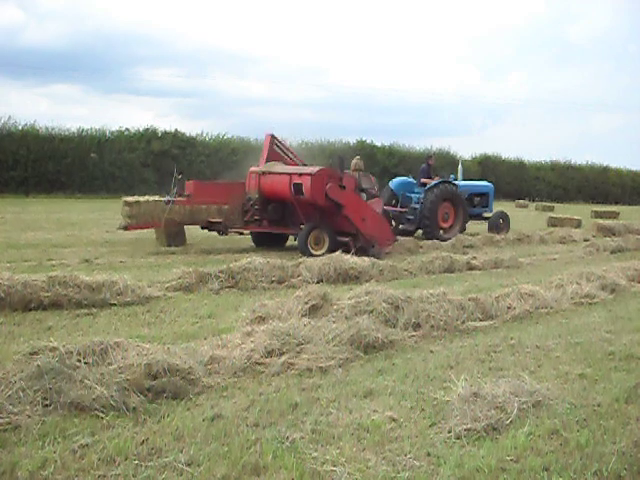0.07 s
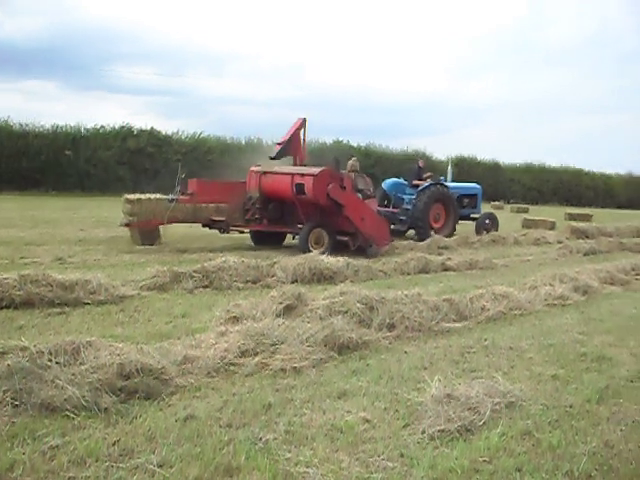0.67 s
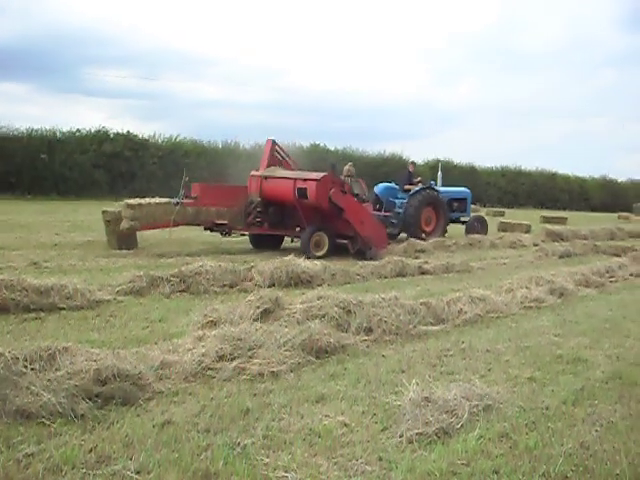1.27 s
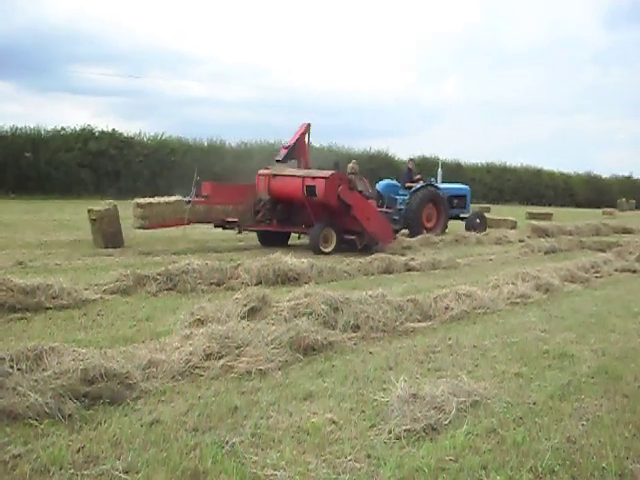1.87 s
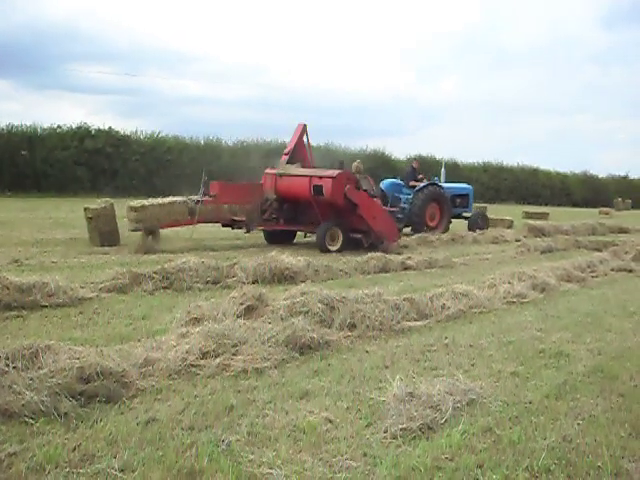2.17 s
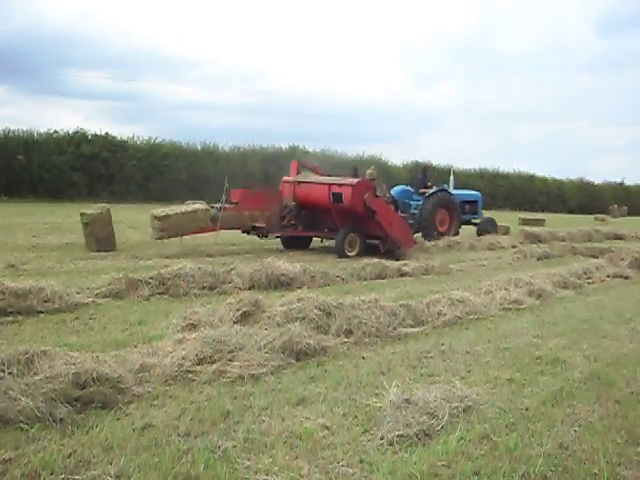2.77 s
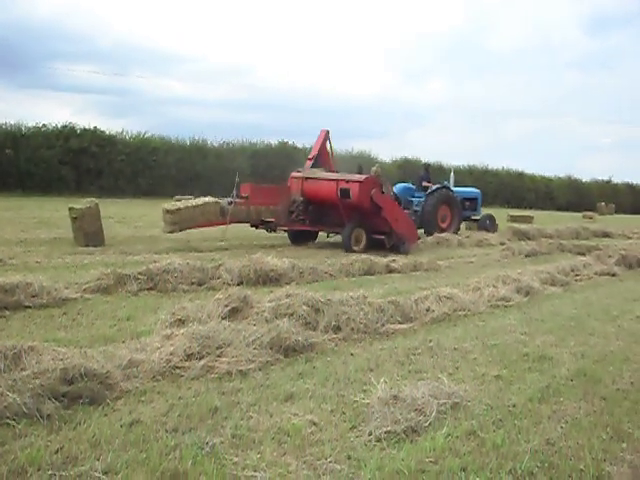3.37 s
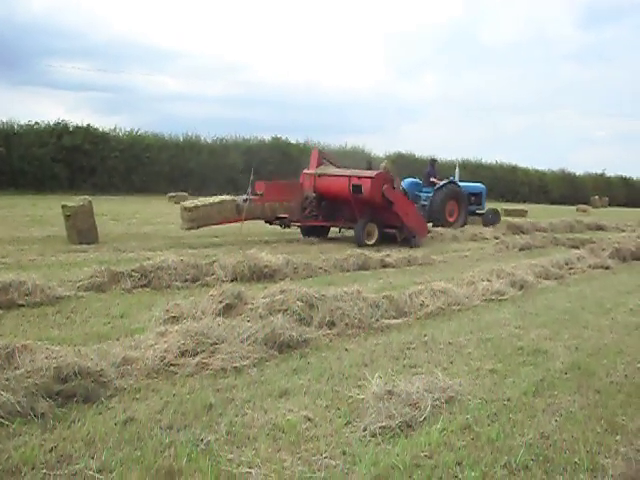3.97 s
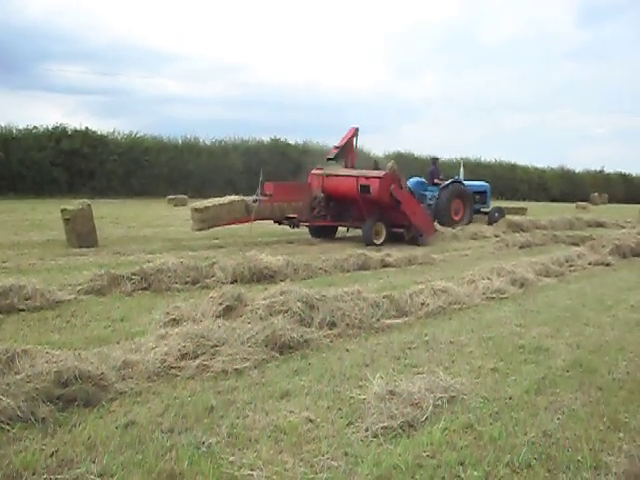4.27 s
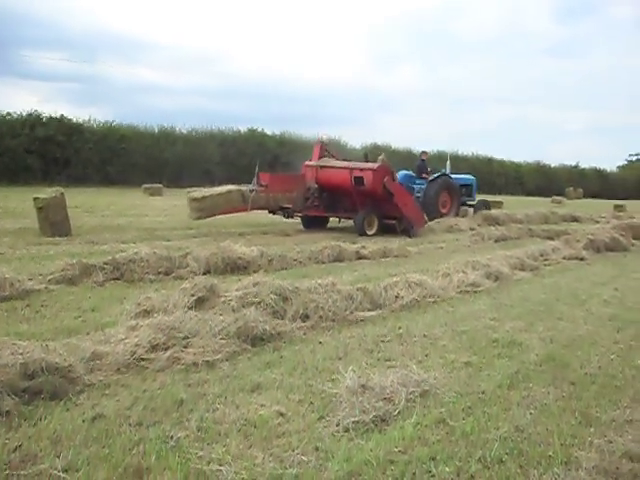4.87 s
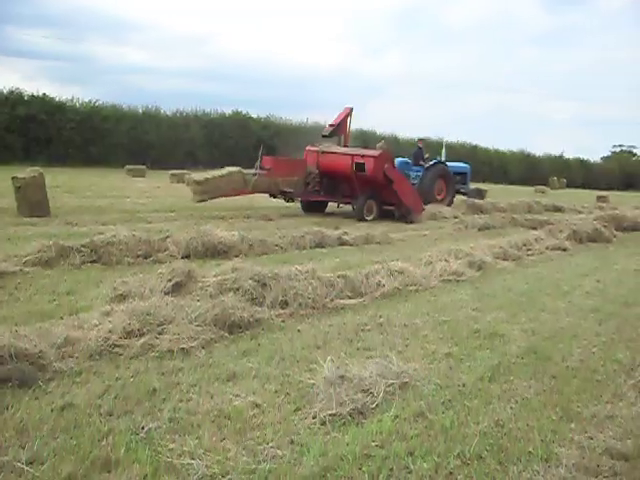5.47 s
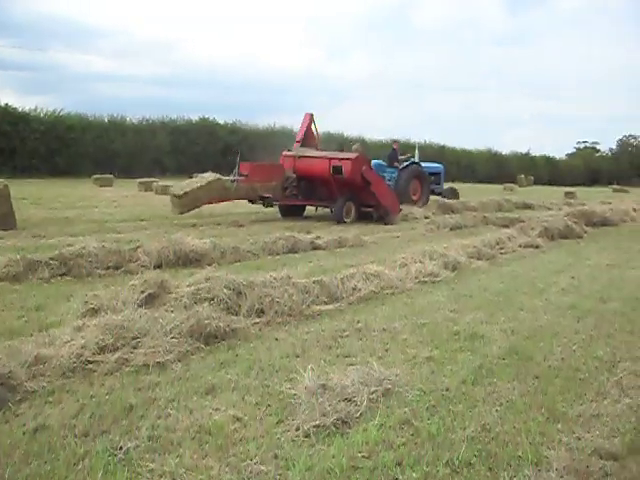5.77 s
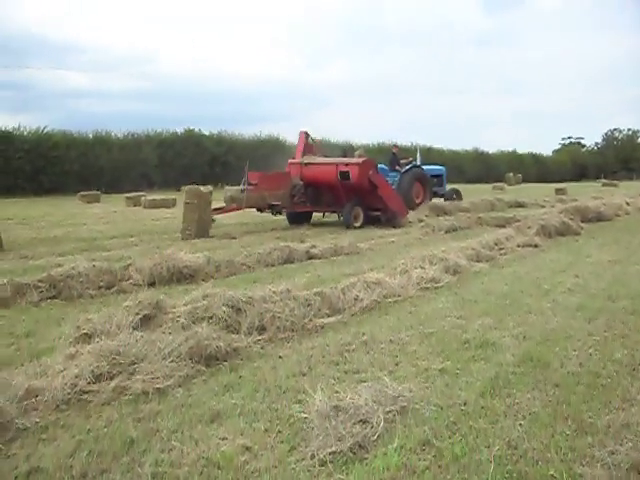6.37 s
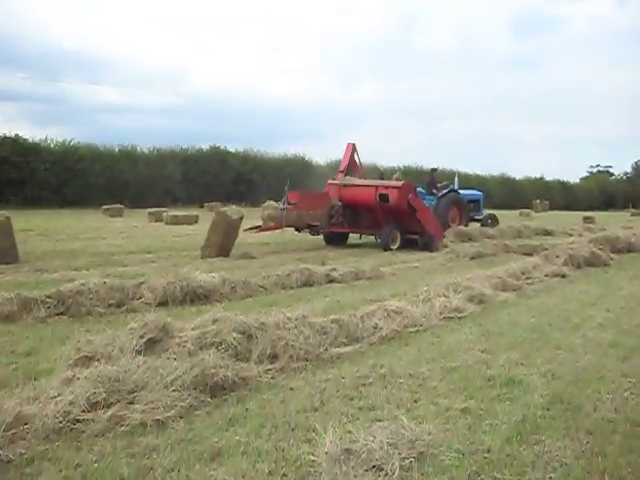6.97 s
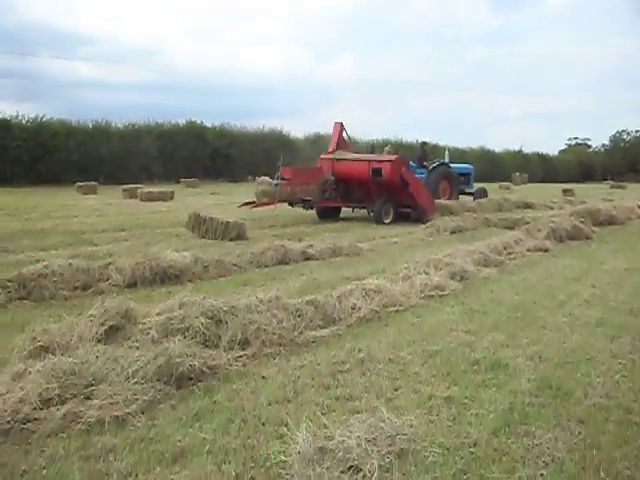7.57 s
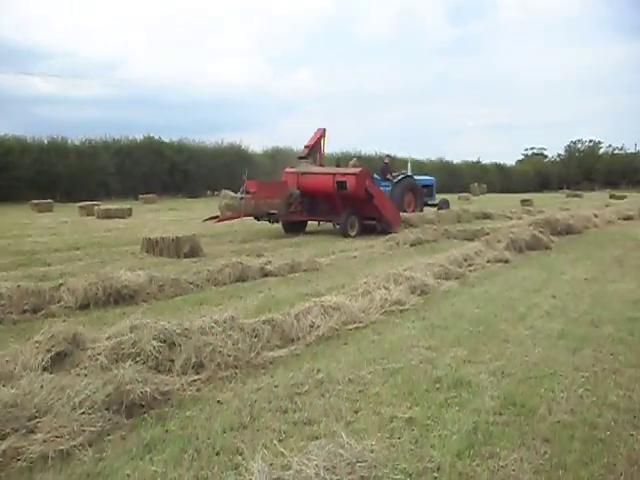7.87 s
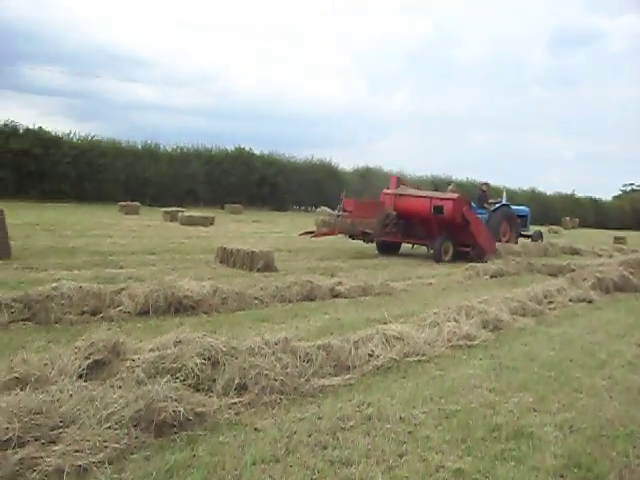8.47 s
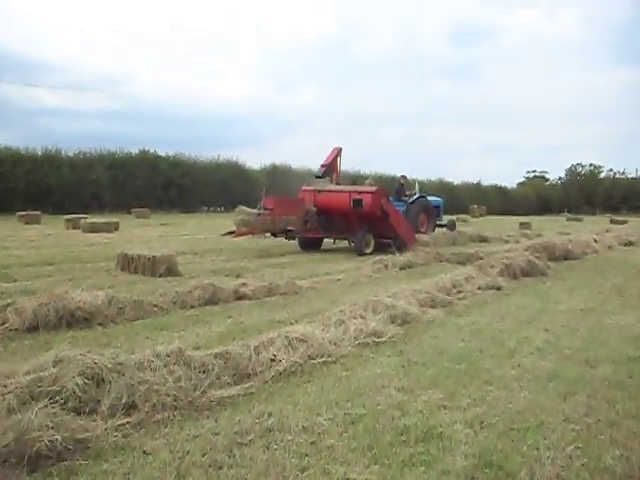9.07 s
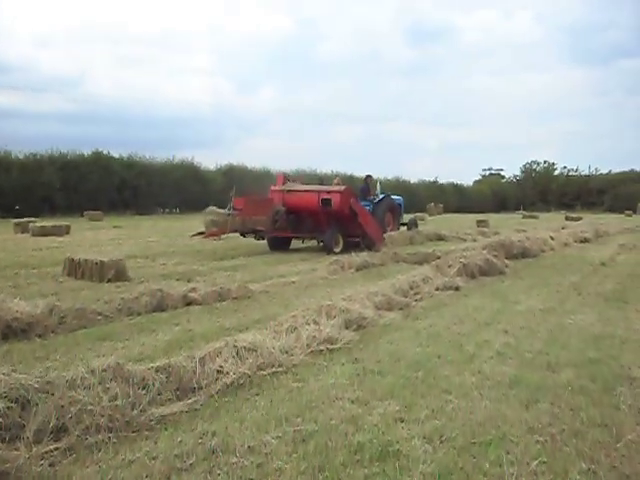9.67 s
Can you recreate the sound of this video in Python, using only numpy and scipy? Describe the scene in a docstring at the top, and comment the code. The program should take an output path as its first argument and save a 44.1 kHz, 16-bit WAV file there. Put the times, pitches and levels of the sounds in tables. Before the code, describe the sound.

A tractor chugs some way off while a hay baler rattles, clanks and knocks regularly, with gusts on the microphone.

```python
"""Tractor and hay baler in a field

Some way off, an old tractor chugs along, pulling a baler with a humming drive. The baler's pick-up
rattles through dry hay, and its ram packs the hay into a droning steel chamber, knocking about every
1.2 s. Linkages clank, and metal parts squeak, ring and chink. Gusts buffet the microphone, mostly in
the first seconds, and a faint, high whistle comes in chirps."""
import sys
import numpy as np
from scipy import signal
from scipy.fft import rfft, irfft
from scipy.io import wavfile
from scipy.ndimage import uniform_filter1d

SR = 44100
rng = np.random.default_rng(int(sys.argv[2]) if len(sys.argv) > 2 else 0)


def dump_mix(stems):
    """Bounce the given channels to the path in sys.argv[1] as a 16-bit WAV at rate SR."""
    frames = np.atleast_2d(stems).T  # one column per channel
    limited = np.clip(frames, -1, 1)  # hard clip at full scale
    pcm = np.round(limited * 32767).astype(np.int16)
    wavfile.write(sys.argv[1], SR, pcm)


N = 428652
TIME = np.arange(N) / SR
FREQUENCIES = np.fft.rfftfreq(N, 1 / SR)

# Levels in the tables are relative. A ring time (t60) is how long a sound takes to fade by 60 dB.
# The whistle's tones. Each row: pitch in Hz, level in dB.
WHISTLE_TONES = [(8630, 0), (8320, -5), (8090, -16)]
# Its chirps. Each row: peak time in seconds, level in dB, half length in seconds, pitch factor.
CHIRPS = [(0.06, -59, .06, 1.005), (0.215, -64, .03, .985), (0.39, -55, .045, .997), (0.65, -62, .08, .985),
          (1.0, -65, .06, .983), (1.35, -64, .06, 1.004), (2.58, -65, .04, 1.003), (5.15, -66.5, .15, .985)]
# The breeze. Each row: time in seconds, level in dB.
BREEZE = [(0, -37.5), (2.3, -39), (3.0, -43), (4.3, -37.5), (5.0, -48.5), (6.7, -59), (7.8, -56),
          (8.7, -44.5), (9.72, -48)]

# Brief swells. Each row: peak time in seconds, level in dB, half length in seconds.
GUSTS = [(0.09, -24.5, 0.086), (0.33, -27, .04), (0.5, -22.5, 0.035), (0.62, -27, 0.03), (0.77, -23, 0.065),
         (1.26, -21, 0.07), (1.59, -28, 0.078), (2.0, -31.5, 0.037), (2.26, -28.5, 0.087),
         (3.75, -39.5, 0.085), (4.14, -30.5, 0.14), (4.52, -34, 0.072), (5.18, -38.5, 0.044),
         (5.36, -39, 0.045), (6.07, -37, 0.066)]
THUMPS = [(0.125, -30, 0.012), (0.24, -38, 0.013), (0.4, -36.5, 0.018), (0.58, -29, 0.011),
          (0.64, -33, 0.047), (0.738, -30, 0.0076), (0.774, -23.5, 0.011), (1.19, -32.5, 0.02),
          (1.242, -19.5, 0.007), (1.275, -28.5, 0.013), (1.3, -24, 0.011), (1.57, -30.5, 0.016),
          (1.615, -30.5, 0.019), (2.148, -33, 0.01), (2.175, -29.5, 0.0094), (2.248, -30.5, 0.012),
          (2.3, -35.5, .02), (2.395, -31.5, 0.024), (4.146, -31, 0.012), (4.539, -34.5, 0.0079)]  # swirls of air hit the microphone squarely
BOOMS = [(5.25, -46, 0.055), (6.42, -40, 0.098), (8.35, -45.5, .07), (8.74, -42.5, .11)]  # the machines' rumble booms
HAY_WADS = [(0.06, -47, 0.083), (0.66, -45.5, 0.045), (2.32, -48, 0.073), (2.78, -47.5, 0.048),
            (3.07, -50, 0.036), (4.265, -48.5, .04), (4.47, -47.5, 0.038), (6.61, -50, 0.034),
            (6.93, -45.5, .022), (7.04, -47, 0.038)]  # thick wads pass the pick-up

# Tone colours. Each row: frequency in Hz, level in dB.
BUFFET_SPECTRUM = [(3, -20), (10, 1), (22, 2.5), (45, 2), (80, -1), (130, -8.5), (250, -21.5), (600, -66),
                   (3000, -120)]  # breeze and gusts
THUMP_SPECTRUM = [(50, -18), (110, 4), (200, 3), (350, -4.5), (550, -12.5), (1000, -22), (2500, -48),
                  (8000, -100)]  # fluttering air
RUMBLE_SPECTRUM = [(20, -20), (45, -13), (70, -0.5), (105, -1), (132, -7.5), (155, 3.5), (188, -3),
                   (208, -2.5), (224, 3), (240, -4.5), (265, -5.5), (450, -11), (900, -43), (3000, -80)]  # running machines
RATTLE_SPECTRUM = [(530, -27), (900, 0.5), (1040, 7), (1710, 4.5), (2130, 4), (2450, 3), (2970, -0.5),
                   (3270, 0), (3600, -1), (4450, 1.5), (5120, -3.5), (6820, -5), (8530, -10.5),
                   (10000, -16.5), (12300, -23.5), (22000, -60)]  # chains, tines (the pick-up's spring teeth) and hay
MICROPHONE_TREBLE = [(10200, 0), (10600, -5.5), (11000, -12), (11700, -12), (12300, -20)]  # the microphone's dull top end

# Tones of the exhaust and the baler's drive. Each row: multiple of the firing or drive rate, level in dB.
EXHAUST_TONES = [(0.5, -26), (1, 0), (1.5, -23), (2, -2.5), (2.5, -24), (3, -12), (4, -20.5), (5, -28.5),
                 (6, -27)]
DRIVE_TONES = [(1, -12), (2, 1.5), (3, -4.5), (4, -5), (5, -10.5), (6, -13.5)]
# The sheet-steel chamber's resonances. Each row: pitch in Hz, width in Hz, level in dB.
CHAMBER_RESONANCES = [(588, 170, -2), (670, 77, -1.5), (758, 56, 0), (839, 69, -4.5)]
# Short metal tones: joint squeaks, the ring of clanks, and small high chinks.
# Each row: start in seconds, pitch in Hz, level in dB, ring time in seconds.
METAL_TONES = [(0.873, 5890, -29, 0.035), (1.545, 7000, -41, .05), (1.705, 2450, -44, .11),
               (2.205, 2700, -31, .07), (2.43, 2080, -31, .1), (2.603, 4000, -44, 0.16),
               (2.74, 5100, -41, 0.28), (3.352, 6550, -40, .05), (3.393, 3400, -40, .13),
               (3.414, 6150, -39, .05), (3.698, 2130, -35, 0.11), (3.697, 3370, -41, 0.15),
               (3.698, 4220, -43, 0.12), (4.626, 3510, -39, .12), (6.11, 2480, -46, 0.18),
               (6.496, 2410, -46, .3), (6.64, 2756, -42, .13), (6.769, 6250, -36, .05),
               (7.254, 5512, -47, .12), (7.364, 4600, -33, 0.075), (7.405, 4300, -41, .12),
               (7.688, 2447, -43, 0.15), (7.94, 6170, -42, .05), (8.11, 6820, -43, .05),
               (8.484, 4450, -45, 0.18), (8.74, 6540, -42, .05)]

# How the steel rings. Each row: frequency in Hz, level in dB, basic ring time in seconds.
LINK_RING = [(500, -16, .14), (1600, -12, .14), (2150, -3, .16), (2450, -4, .14), (2750, -1, .15),
             (3050, -5, .13), (3400, 0, .16), (3750, -2, .13), (4400, 3.5, .16), (5050, -2, .12),
             (5900, -9, .11), (7300, -4, .11), (8500, -6.5, .1), (10000, -13, .08), (12200, -24, .06)]  # the linkages
FRAME_RING = [(149.9, 9.5, 0.28), (222, 10, 0.23), (337, 1.5, 0.26), (430, -2.5, 0.2), (560, -5, 0.2),
              (690, 2.5, 0.23), (790, 5, 0.2), (960, 1.5, 0.14), (1380, 1.5, 0.15), (1930, -2, 0.13),
              (2520, 1, 0.097), (3380, -7, 0.11), (4150, -0.5, 0.072), (4830, -9, 0.082),
              (7930, -17.5, 0.073), (9900, -25, 0.053), (12177, -31, 0.045)]  # the frame's many weak tones
FRAME_TONES = [(786, -0.5, 0.17), (835.3, -1, 0.13), (928, -5.5, 0.11), (1400, -5, 0.085), (1786, -3, 0.06),
               (2350, -8, 0.097), (2740, 0, 0.051)]  # its few strong ones
# Linkage clanks. Each row: start in seconds, level in dB, brightness in dB per octave,
# ring time factor, rebound level in dB.
CLANKS = [(0.3333,-27,-6,0.77,-5), (1.100,-29,-13.5,.5,-11), (2.2111,-24,-5.5,.5,-10),
          (2.2762,-30,-9,0.77,-6), (2.4324,-22.5,-8.5,0.59,-14), (2.509,-35,0,.4,-12),
          (2.5993,-33,-3,0.4,-21), (2.7253,-21.5,-5,0.55,-15), (2.7683,-25,-4,.6,-14),
          (3.339,-35.5,-5,0.9,-14), (3.417,-33,-9,.5,-14), (3.4464,-30,-10.5,.8,-11),
          (3.6994,-30.5,-7,.55,-4), (4.6317,-27.5,-9,0.53,-12), (4.7994,-26,-5,0.67,-19),
          (5.1753,-27.5,-5,0.78,-7), (5.895,-30,-5,0.6,-14), (6.2701,-33.5,-7.5,0.55,-16),
          (6.594,-34,-5,.7,-10), (6.9969,-28,-4.5,0.77,-6), (7.0808,-29.5,-5.5,0.72,-9),
          (7.3635,-27.5,-5,0.63,-9), (7.8177,-30.5,-8,0.54,-16), (8.1426,-30,-9.5,0.76,-8),
          (8.253,-37.5,-3,0.62,-16), (8.4813,-30.5,-5.5,0.5,-3), (8.8218,-31,-6.5,.7,-3),
          (9.181,-29.5,-5,0.44,-4), (9.282,-28.5,-13,.7,-7)]
# The ram rubs its guide. Each row: start in seconds, level in dB, band width in Hz.
SCRAPES = [(0.822, -20, 2500), (2.005, -28, 3500), (3.192, -22, 3000), (5.539, -30, 3000),
           (6.7222, -16, 809), (7.8915, -16, 1000), (9.0625, -17, 1200)]
# Ram strokes. Each row: knock time in seconds, level in dB, ring time factor, strong tones in dB,
# hay load in dB, wait until the groan in seconds, groan in dB, next forkful in dB.
STROKES = [(0.828, -12.5, 0.95, -4.5, -4, 0.3, -5, -21), (2.008, -13.5, 0.96, -3.5, 2, 0.3, -4.5, 0),
           (3.1926, -13.5, 0.84, 1, 0.5, 0.29, 0, -2.5), (4.371, -14.5, 0.89, -1, -1, .27, 0.5, -2),
           (5.543, -15, 0.98, -5.5, -2, 0.28, 0, -2), (6.727, -14, 0.84, -8.5, -3, 0.23, -0.5, -2.5),
           (7.901, -15, 0.75, -9, -0.5, .24, 1.5, 2.5), (9.070, -16.5, 0.8, -5, -3, 0.25, -0.5, -2)]


def amp(db):
    """Turns decibels into a gain."""
    return 10 ** (np.asarray(db) / 20)


def unit(x):
    """Scales a signal to an average (rms) level of 1."""
    return x / np.sqrt(np.mean(x ** 2) + 1e-20)


def read(rows, hz):
    """Looks up a frequency table's other columns at hz."""
    f, *columns = np.transpose(rows)
    return [np.interp(np.log(hz + 1), np.log(f + 1), c) for c in columns]


def colour(x, spectrum):
    """Gives x a tone colour, at level 1."""
    return unit(irfft(rfft(x) * amp(read(spectrum, FREQUENCIES)[0]), N))


def noise():
    """Plain white hiss."""
    return rng.standard_normal(N)


def drift(hz):
    """A random wobble, up to about hz."""
    return unit(irfft(rfft(noise()) / (1 + (FREQUENCIES / hz) ** 4), N))


def resonate(x, bands):
    """Passes x through resonances, each given as pitch, width and level."""
    gain = sum(amp(db) / (1 + ((FREQUENCIES - hz) / width * 2) ** 2) for hz, width, db in bands)
    return unit(irfft(rfft(x) * gain, N))


def steady(x, seconds):
    """Evens out the slow swells in a noise."""
    size = max(int(seconds * SR), 2)
    power = uniform_filter1d(uniform_filter1d(x ** 2, size), size)
    return x / np.sqrt(abs(power) + 1e-6)


def add(mix, s, sound):
    """Mixes a sound in at s seconds."""
    part = mix[max(round(s * SR), 0):][:len(sound)]
    part += sound[:len(part)]


def swells(rows):
    """Bell-shaped rises and falls in level."""
    return sum(amp(db) * np.exp(-((TIME - s) / half) ** 2) for s, db, half, *_ in rows)


def strokes():
    """Stroke times and levels, with one extra at each end because the ram never stops."""
    s, *_, load_db, lag, groan_db, fork_db = np.transpose(STROKES)
    period = np.mean(np.diff(s))
    knock_s = np.r_[s[0] - period, s, s[-1] + period]
    lag, *levels_db = [np.pad(column, 1, mode="edge") for column in (lag, load_db, groan_db, fork_db)]
    return knock_s, knock_s + lag, *levels_db


def each_stroke(times, levels_db, rise_s, fall_s):
    """One swell in level at each of the times."""
    level = np.zeros(N)
    for s, db in zip(times, levels_db):
        t = TIME - s
        level += amp(db) * np.exp(-(t / np.where(t < 0, rise_s, fall_s)) ** 2)
    return level


def stroke_wave(top_s):
    """A wave that peaks top_s after each knock, and the strokes per second."""
    knock_s = strokes()[0]
    turns = np.interp(TIME, knock_s, np.arange(len(knock_s)))
    strokes_per_s = np.gradient(turns) * SR
    return np.cos(2 * np.pi * (turns - top_s * strokes_per_s)), strokes_per_s


def crank(per_stroke, swing, fastest_s, wander=.006):
    """Counts a machine's cycles; its speed sags each time the ram packs the hay."""
    wave, strokes_per_s = stroke_wave(fastest_s)
    speed = per_stroke * strokes_per_s * (1 + swing * wave + wander * drift(4.03))
    return np.cumsum(speed) / SR


def ping(hz, t60, rise_s, scatter):
    """One tone of a steel part builds and dies away; rubbing scatters its pitch."""
    t = np.arange(SR // 4) / SR
    wander = unit(uniform_filter1d(rng.standard_normal(len(t)), size=120))
    turns = np.cumsum(hz * (1 + scatter * wander)) / SR + rng.random()
    return np.sin(2 * np.pi * turns) * (1 - np.exp(-t / rise_s)) * amp(-60 * t / t60)


def strike(blows, body, rise_s, variety, uneven_db, gap_s, settle_db, count=440):
    """Struck steel rings with many tones; each blow hits a new spot and chatters as the part settles."""
    t = np.arange(SR // 6) / SR
    edges = np.linspace(np.sqrt(body[0][0]), np.sqrt(body[-1][0]), count + 1) ** 2
    hz = edges[:-1] + np.diff(edges) * rng.random(count)
    db, t60 = read(body, hz)
    build_up = 1 - np.exp(-t / (rise_s * np.sqrt(2000 / hz))[:, None])  # low tones start more slowly
    tones = build_up * np.exp(np.outer(2j * np.pi * hz, t))
    fade = np.outer(-np.log(1000) / t60, t)
    phases = np.exp(2j * np.pi * rng.random(count))
    contacts = amp(settle_db * np.arange(4))
    contacts /= np.linalg.norm(contacts)
    out = np.zeros(N)
    for s, level_db, tilt_db, length in blows:
        favoured = unit(uniform_filter1d(rng.standard_normal(count), size=10))
        real, imaginary = rng.standard_normal((2, len(contacts), count))
        spots = (phases + variety * (real + 1j * imaginary)) * amp(uneven_db * favoured)
        weights = spots * np.sqrt(np.diff(edges)) * amp(db + tilt_db * np.log2(hz / 2000))
        rings = (weights @ (tones * np.exp(fade / length))).real
        gaps = gap_s * (.5 + rng.random(len(contacts) - 1))
        for delay, force, ring in zip(np.r_[0, np.cumsum(gaps)], contacts, rings):
            add(out, s - .001 + delay, amp(level_db) * force * ring / np.std(ring[:SR // 100]))
    return out


def whistle(start_db=-66.5, fade_db_per_s=.9, flicker_db=4):
    """A thin, high whistle wavers, flares in short chirps and fades."""
    level = np.hypot(amp(start_db - fade_db_per_s * TIME), swells(CHIRPS))
    chirp_s, *_, factors = np.transpose(CHIRPS)
    pitch = np.interp(TIME, chirp_s, factors) * (1 + .004 * drift(25))
    tone = 0
    for hz, db in WHISTLE_TONES:
        turns = np.cumsum(hz * pitch * (1 + .003 * drift(150))) / SR
        tone += amp(db + flicker_db * drift(18)) * np.sin(2 * np.pi * turns)
    return level * unit(tone)


def wind(buffet_db=2, lumpy_db=2.5):
    """Air swirls on the microphone in slow lumps and short, fluttering thumps."""
    breeze = amp(np.interp(TIME, *np.transpose(BREEZE)) + lumpy_db * drift(6.1))
    force = np.hypot(breeze, swells(GUSTS))
    lumps = steady(colour(noise(), BUFFET_SPECTRUM), .16) * force
    flutter = steady(colour(noise(), THUMP_SPECTRUM), .02)
    return amp(buffet_db) * lumps + swells(THUMPS) * flutter


def field_echo(x, echo_db=-19, t60=.19):
    """Ground and hedge scatter the sound, adding a faint, dull tail."""
    t = np.arange(SR // 2) / SR
    dull_noise = signal.lfilter([1], [1, -.6], rng.standard_normal(len(t)))
    tail = dull_noise * amp(-60 * t / t60) * (t > .02)
    return x + amp(echo_db) * signal.oaconvolve(x, tail / np.linalg.norm(tail))[:N]


def hum(turns, tones, wavers):
    """Wavering tones at multiples of a machine's rate."""
    return sum(amp(db) * waver * np.cos(2 * np.pi * (k * turns + rng.random()))
               for (k, db), waver in zip(tones, wavers))


def tractor(firings, exhaust_db=-38.5, rumble_db=-48.5, chug=.38, surge_db=.7, labour_db=.91):
    """The exhaust hums over a rumble that chugs with the engine and labours with each ram stroke."""
    strength = (1 + .16 * drift(18)) * amp(surge_db * drift(3.2))
    wavers = [amp(.6 * k * drift(4)) for k, _ in EXHAUST_TONES]  # higher tones waver more
    exhaust = unit(strength * hum(firings, EXHAUST_TONES, wavers))
    throb = 1 + chug * np.cos(np.pi * firings)
    labour = labour_db * stroke_wave(top_s=.24)[0]
    rumble = steady(colour(noise() * throb, RUMBLE_SPECTRUM), .13)
    booms = swells(BOOMS) * steady(resonate(noise(), [(162, 34, 0)]), .066)
    return amp(exhaust_db) * exhaust + amp(rumble_db + labour) * rumble + booms


def drive(turns, level_db=-41.5):
    """The baler's drive hums at its own slower rate, beating against the exhaust."""
    wavers = [1 + .15 * drift(8) for _ in DRIVE_TONES]
    return amp(level_db) * unit(hum(turns, DRIVE_TONES, wavers))


def chamber(shake, idle_db=-49.5, packing_db=-43, rubbing_db=-43.5):
    """The steel chamber drones as the ram drives in; packed hay rubs and groans as it draws back."""
    knock_s, groan_s, load_db, groan_db, _ = strokes()
    packing = each_stroke(knock_s - .36, packing_db + load_db, rise_s=.05, fall_s=.06)
    load = np.hypot(amp(idle_db), packing + amp(1) * swells(HAY_WADS))
    drone = steady(resonate(noise() * shake, CHAMBER_RESONANCES), .1)
    rubbing = each_stroke(groan_s, rubbing_db + groan_db, rise_s=.07, fall_s=.11)
    groan = steady(resonate(noise(), [(657, 130, -4.5), (754, 87, 1)]), .062)
    return load * drone + rubbing * groan


def pick_up(shake, ticks_per_s=200, tick_kinds=8, feed_db=-47.5, sweep_db=-46, refill_db=-48):
    """Chains and tines tick in rustling hay, louder as the ram sweeps it and the feeder forks in more."""
    knock_s, groan_s, load_db, _, fork_db = strokes()
    t = np.arange(SR // 25) / SR
    ticks = np.zeros(N)
    for _ in range(tick_kinds):
        size_db = 3 * np.minimum(rng.exponential(1, N), 4)
        taps = (rng.random(N) < ticks_per_s / tick_kinds / SR) * amp(size_db)
        tick = rng.standard_normal(len(t)) * amp(-60 * t / .044)
        ticks += signal.oaconvolve(taps, tick)[:N]
    hay = noise() * shake * amp(1.2 * drift(35))
    sweep = each_stroke(knock_s - .09, sweep_db + load_db, rise_s=.113, fall_s=.1138)
    refill = each_stroke(groan_s, refill_db + fork_db, rise_s=.1455, fall_s=.09)
    feed = np.hypot(amp(feed_db + .62 * drift(7.3)), sweep + refill + swells(HAY_WADS))
    return feed * (amp(-4) * colour(ticks, RATTLE_SPECTRUM) + amp(-2.5) * colour(hay, RATTLE_SPECTRUM))


def metal_tones(tines_db=-47.5, chinks=110):
    """Short metal tones: joints squeak, clanks ring on, and small parts and springy tines chink."""
    out = np.zeros(N)
    for s, hz, db, t60 in METAL_TONES:
        add(out, s, amp(db) * ping(hz, t60, rise_s=.004, scatter=.014))
    for when, pitch, force in rng.random((chinks, 3)):
        hz = 2700 + 4400 * np.sqrt(pitch)
        db = tines_db + 8 * (force - .5) - 5 * np.log2(hz / 5000)
        add(out, when * N / SR, amp(db) * ping(hz, t60=.04, rise_s=.002, scatter=.012))
    roughness = 1 + .35 * drift(130)
    return out * roughness


def linkages(gain_db=-10, rebound_s=.029, jostles=12):
    """Slack links clank, strike again on the rebound, and jostle softly at random."""
    blows = []
    for s, db, tilt, ring, rebound_db in CLANKS:
        blows += [(s, db, tilt, ring), (s + rebound_s, db + rebound_db, tilt, ring)]
    blows += [(when * N / SR, -40, -8 * dull, .7) for when, dull in rng.random((jostles, 2))]
    clanks = strike(blows, LINK_RING, rise_s=.0008, variety=1.2, uneven_db=2.2, gap_s=.005, settle_db=-6)
    return amp(gain_db) * clanks


def ram(knock_db=-10, clang_db=-10.5, scrape_db=-9.5, scrape_hz=2600, bright_db_per_octave=2):
    """The ram scrapes its guide and then knocks, making the steel frame ring."""
    scrape, clang = np.zeros((2, N))
    t = np.arange(SR // 10) / SR
    fade = (1 - np.exp(-t / .002)) * amp(-60 * t / .06)
    for s, db, width in SCRAPES:
        grit = resonate(noise(), [(scrape_hz, width, 0)])[:len(t)]
        add(scrape, s - .001, amp(db) * fade * grit)
    for s, stroke_db, _, tones_db, *_ in STROKES:
        for hz, db, t60 in FRAME_TONES:
            shift = 1 + rng.uniform(-.022, .022)  # the hay loads the frame differently each time
            tone = ping(hz * shift, t60, rise_s=.0052, scatter=.009)
            add(clang, s, amp(stroke_db + tones_db + db) * tone)
    blows = [(s, db, bright_db_per_octave, ring) for s, db, ring, *_ in STROKES]
    blows.append((.7935, -16, 7, 1.5))  # the latch slams into the frame just before the first knock
    knocks = strike(blows, FRAME_RING, rise_s=.0015, variety=1.5, uneven_db=1.3,
                    gap_s=.004, settle_db=-12, count=640)
    return amp(knock_db) * knocks + amp(clang_db) * clang + amp(scrape_db) * scrape


def scene(distance_m=15, away_m_per_s=.74):
    """Everything heard from one spot; the chamber and pick-up fade as the baler draws away."""
    firings = crank(per_stroke=62.35, swing=.0077, fastest_s=.495)
    engine = tractor(firings)
    drive_hum = drive(crank(per_stroke=34.5, swing=.022, fastest_s=.642))
    shake = 1 + .12 * np.cos(2 * np.pi * firings) + .044 * np.cos(np.pi * firings)
    nearness = distance_m / (distance_m + away_m_per_s * TIME)
    hay = (chamber(shake) + pick_up(shake)) * nearness
    steel = field_echo(ram() + linkages() + metal_tones())
    return (engine + drive_hum + hay + steel + wind() + whistle())[None]


def record(dry, cutoff_hz=12300):
    """The microphone dulls the high treble and cuts off the very top."""
    dulled = irfft(rfft(dry) * amp(read(MICROPHONE_TREBLE, FREQUENCIES)[0]), N)
    low_pass = signal.firwin(401, cutoff_hz, window=("kaiser", 9), fs=SR)
    return signal.oaconvolve(dulled, low_pass[None], "same")


dry = scene()
out = record(dry)
dump_mix(out)
```